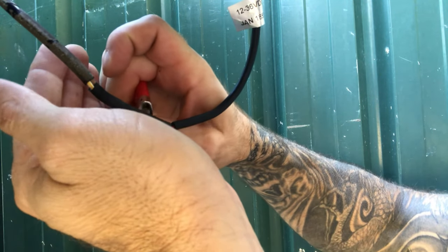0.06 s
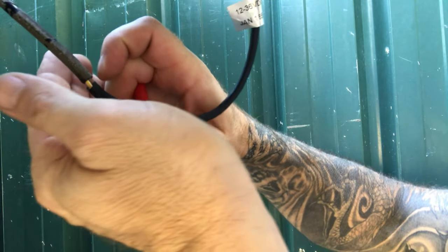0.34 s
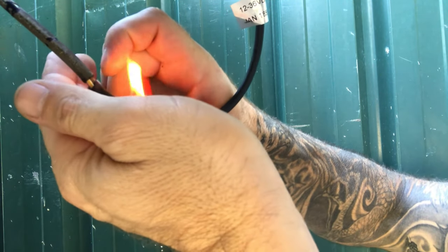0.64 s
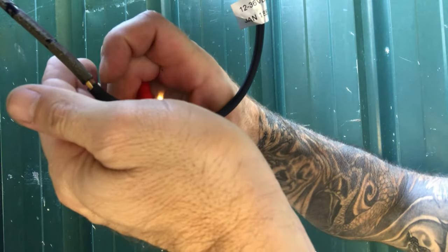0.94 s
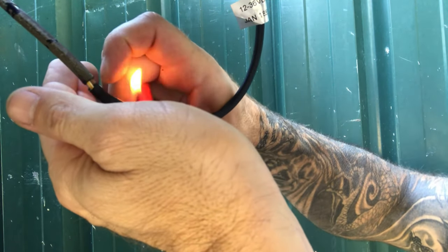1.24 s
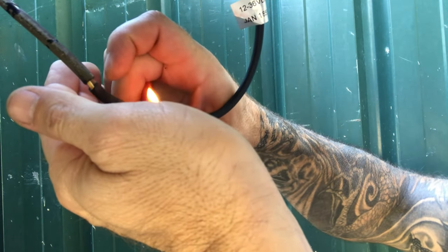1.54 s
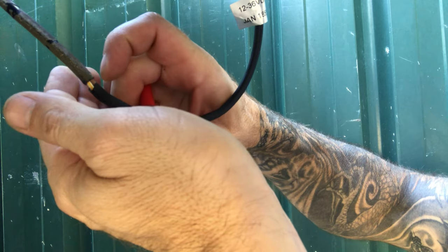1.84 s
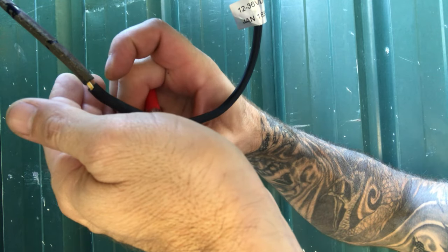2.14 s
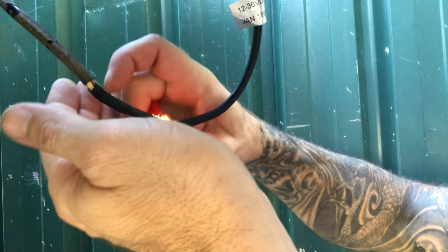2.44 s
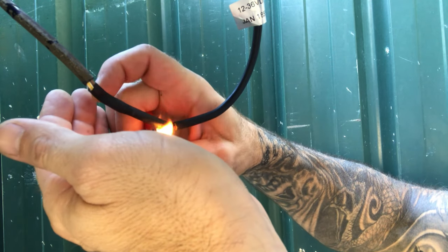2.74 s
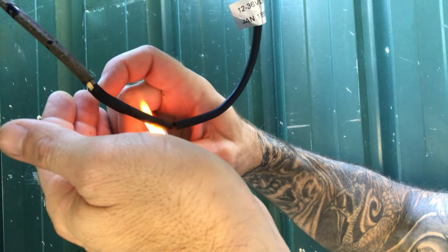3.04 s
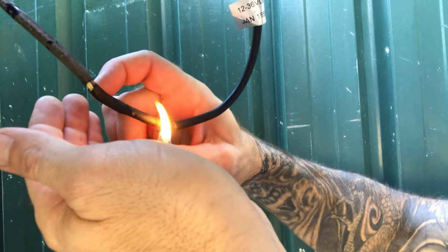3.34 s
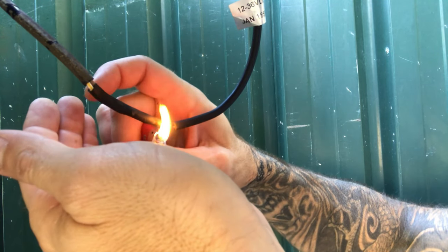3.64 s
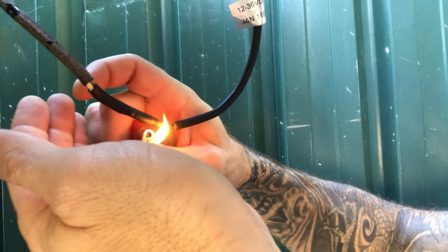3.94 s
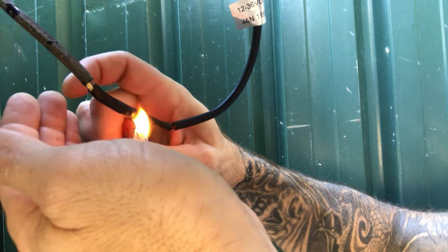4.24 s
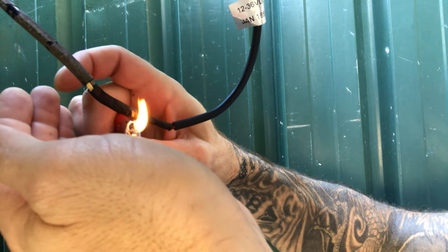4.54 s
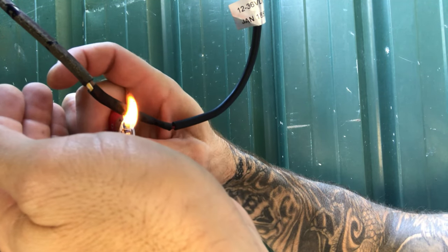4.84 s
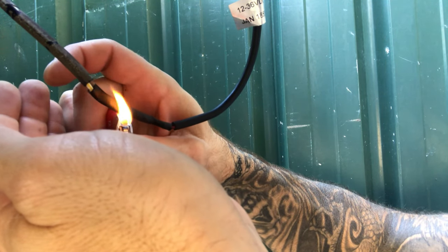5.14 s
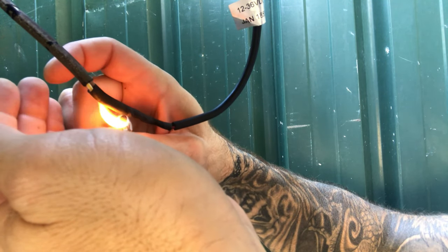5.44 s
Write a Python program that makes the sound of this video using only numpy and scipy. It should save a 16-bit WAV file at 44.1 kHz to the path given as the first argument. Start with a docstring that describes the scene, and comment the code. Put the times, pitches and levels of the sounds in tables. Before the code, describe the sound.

A flint lighter is struck twice close by outdoors, over low wind rumble and a distant engine revving up.

```python
"""Open air, a flint lighter in cupped hands close to the microphone. Wind rumbles on the capsule over
far traffic and a faint whine. At 0.4 s the wheel grinds, then rasps over the flint; the thumb lands on
the gas lever and small parts tick. Far birds whistle, and from 1.2 s a distant engine drones up through
its revs. The second strike comes at 2.4 s. After 4 s the birds call again, and near 5 s a car's tyres
sing on a far road."""
import sys
import numpy as np
from scipy import signal
from scipy.fft import rfft, irfft, next_fast_len
from scipy.io import wavfile

SR = 44100
rng = np.random.default_rng(int(sys.argv[2]) if len(sys.argv) > 2 else 0)


def to_wav(sig):
    """Store sig (one row per channel, or 1-D mono) as 16-bit WAV at the path in sys.argv[1].

    Samples outside -1..1 are clipped; the rate is SR.
    """
    pcm = np.clip(np.atleast_2d(sig), -1, 1) * 32767
    pcm = np.round(pcm).astype(np.int16)
    wavfile.write(sys.argv[1], SR, pcm.T)  # frames by channels


N = 241823
TIME = np.arange(N) / SR

# spectra of wind on the microphone, far traffic and fine hiss: (frequency [Hz], relative density [dB])
WIND_SPECTRUM = [(24, -40), (33, -35), (45, -1), (60, -2), (80, 1), (110, 2.5), (160, -13), (235, -7.5),
                 (330, -15), (480, -23.5), (800, -39)]
TRAFFIC_SPECTRUM = [(200, -9), (310, -2), (480, -10), (650, -3.5), (770, -7), (920, -5), (1100, -6.5),
                    (1500, -9.5), (2200, -18), (3200, -34)]
HISS_SPECTRUM = [(1200, -19), (2000, -2.5), (2600, -1.5), (3300, -3.5), (4350, -6.5), (4850, -12.5),
                 (5400, -9.5), (6650, -11), (8200, -18), (9350, -17), (10400, -27.5), (11500, -22.5),
                 (15800, -22)]
# rise and fall of the far traffic: (time [s], relative level [dB])
TRAFFIC_SWELL = [(0.0, -54), (0.69, -52.5), (2.14, -55), (3.4, -54), (3.97, -55.5), (4.49, -54),
                 (5.48, -53)]
# far birds: (start [s], end [s], start pitch [Hz], end pitch [Hz], level [dB], hoarseness [Hz])
BIRD_CALLS = [(.48, .69, 4520, 4520, -67, 80), (1.22, 1.42, 4370, 4200, -71, 55),
              (1.74, 1.87, 4400, 4430, -73, 50), (1.98, 2.15, 4420, 4410, -73, 70),
              (4.06, 4.13, 4150, 4430, -65, 60), (4.09, 4.22, 4450, 4440, -60, 70),
              (4.2, 4.32, 4300, 4140, -65, 50), (4.24, 4.36, 3660, 3300, -60, 250)]
# the distant engine picks up quickly, then pulls steadily: (time [s], firing rate [Hz])
ENGINE_REVS = [(1.2, 57), (1.42, 64.5), (1.84, 89.6), (2.2, 90.1), (2.38, 94.8), (2.75, 96.8), (4.0, 111.6),
               (5.48, 120)]
# its drone swells and sinks on the way: (time [s], relative level [dB])
ENGINE_SWELL = [(1.2, -54), (1.4, -42.5), (1.69, -48.0), (1.8, -34.5), (2.21, -34.5), (2.36, -29.1),
                (2.75, -28), (2.91, -34.5), (3.08, -55), (3.15, -40.5), (3.42, -29.5), (4.02, -27.8),
                (4.37, -32.5), (4.44, -39), (4.76, -38), (4.93, -49.7), (5.31, -48.5), (5.46, -38.5)]
# exhaust; uneven cylinders add in-between lines: (multiple of firing rate, relative level [dB])
EXHAUST_PARTIALS = [(.45, -35), (0.751, -32), (1, .5), (1.249, -25), (1.67, -34), (2, -33.5), (2.25, -32)]
# resonances that boom as a partial climbs through: (frequency [Hz], half width [Hz], boost [dB])
EXHAUST_BOOMS = [(50.5, 2, 19), (191.2, 2.4, 12), (215.4, 2.5, 8.5)]
# ringing of the plastic body and of the steel wheel on its axle: (frequency [Hz], width [Hz], gain [dB])
BODY_MODES = [(820, 220, -3.5), (1440, 280, -3), (2020, 420, -0.5), (3080, 560, -6)]
WHEEL_MODES = [(3300, 190, -2.5), (3630, 290, 7), (5180, 230, -4), (7650, 180, 7.5), (10100, 200, -12),
               (11800, 300, -5)]
# ringing of the metal hood, shifted by the grip in each strike: (frequency [Hz], width [Hz], gain [dB])
FIRST_HOOD_MODES = [(1480, 110, -3), (2340, 180, -11), (3100, 340, -6), (3900, 250, 2), (5500, 130, 4),
                    (6270, 120, -1), (6950, 130, 1), (8330, 150, 2), (9430, 150, 5), (10300, 200, -8),
                    (11100, 150, -10), (12800, 160, -1), (15600, 120, -6)]
SECOND_HOOD_MODES = [(1870, 160, -10), (3230, 230, -3), (5350, 90, 2), (5700, 90, 1), (6500, 100, -1),
                     (6970, 160, 1), (7300, 180, -1), (7850, 80, -5), (9540, 100, -2), (10100, 110, 5),
                     (12000, 100, -8), (12800, 225, 4), (13800, 400, -8)]
# colour that the grip gives each strike: (frequency [Hz], relative gain [dB])
FIRST_GRIP_COLOUR = [(500, -10), (1400, 3), (3200, 2.5), (4800, -3.5), (6700, 5.5), (8700, -1), (11000, -1),
                     (15800, 1.5)]
SECOND_GRIP_COLOUR = [(500, -2), (1800, -3), (3200, -3.5), (4800, -3.5), (6800, 1.5), (8800, -5),
                      (13000, -3), (15800, -7)]
# small contacts of wheel and grip: (time [s], relative level [dB], hardness as a low-pass cutoff [Hz])
HANDLING_TICKS = [(.135, -34.5, 3000), (.2035, -48, 12000), (.408, -31, 4500), (.4445, -30, 7000),
                  (.4598, -34, 9000), (2.2247, -40.5, 5000), (2.386, -32, 9000), (2.4115, -45, 12000),
                  (2.4157, -36, 9000), (2.444, -44, 9000), (2.5934, -46, 15000)]
# thumb landing on the gas lever: (time [s], relative level [dB])
LEVER_KNOCKS = [(.4253, -22), (2.3788, -24.5)]
# creep while the thumb still grips the wheel: (start [s], end [s], final level [dB], swell [dB])
WHEEL_GRINDS = [(.386, 0.425, -39, 22), (2.358, 2.375, -44, 7)]
# each turn of the spark wheel:
# (slip time [s], spin length [s], spin level [dB], drag length [s], drag level [dB], slowing [dB/s])
WHEEL_TURNS = [(.4263, 0.0038, -29, 0.021, -37.5, 620), (2.3807, 0.00072, -32.5, 0.03, -35.8, 950)]

WIND_DB = -43.6
HISS_DB, HISS_EARLY_DB, HISS_SETTLES_S = -61.5, 4.5, 1.67   # the hiss starts louder and settles
RUMBLE_DB, RUMBLE_HOLD_S = -47.5, 1.5
WHINE_DB, WHINE_HOLD_S = -65, 1.34
DIE_AWAY_DB_PER_S = 27   # rumble and whine
CAR_NEAREST_S, CAR_PASS_S, CAR_DB = 5.12, 0.57, -57
SPIN_ATTACK_S, SPIN_RELEASE_DB_PER_S = 0.0014, 3000   # the snap of the free spin
ECHO_TAIL_DB, ECHO_TAIL_DB_PER_S = -59, 259   # the faint tail of each rasp, reflected off a wall
MIC_HISS_DB, CUTOFF_HZ = -71.5, 15800


def from_db(db):
    """Decibels to gain."""
    return 10 ** (np.asarray(db) / 20)


def unit_rms(x):
    """Scale to rms 1."""
    return x / np.sqrt(np.mean(x ** 2) + 1e-20)


def curve(points):
    """Join (time, value) points, sample by sample."""
    return np.interp(TIME, *np.transpose(points))


def held(db, until_s, fall_db_per_s):
    """A steady gain that dies away after a given moment."""
    return from_db(db - fall_db_per_s * np.maximum(TIME - until_s, 0))


def drift(rate_hz):
    """Smooth random wander with rms 1."""
    step, run_in = 40, 2000
    pole = np.exp(-2 * np.pi * rate_hz * step / SR)
    noise = rng.standard_normal(N // step + run_in + 2)
    slow = signal.lfilter([1], [1, -2 * pole, pole * pole], noise)[run_in:]
    return np.interp(np.arange(N) / step, np.arange(len(slow)), unit_rms(slow))


def coloured(x, spectrum):
    """Filter a steady sound by a spectrum that falls away beyond its ends; rms 1."""
    hz, db = np.transpose(spectrum)
    size = next_fast_len(N)
    bins_hz = np.maximum(np.arange(size // 2 + 1) * SR / size, 1)
    skirts = np.minimum(bins_hz / hz[0], 1) ** 2 * np.minimum(hz[-1] / bins_hz, 1) ** 2
    gain = from_db(np.interp(np.log(bins_hz), np.log(hz), db))
    return unit_rms(irfft(rfft(x, size) * skirts * gain, size)[:N])


def resonance(x, hz, width_hz):
    """Two-pole resonance with gain 1 at its peak."""
    r = np.exp(-np.pi * width_hz / SR)
    feedback = [1, -2 * r * np.cos(2 * np.pi * hz / SR), r * r]
    return signal.lfilter(np.array([1, 0, -1]) * (1 - r * r) / 2, feedback, x + 1e-18)


def ringing(x, modes):
    """Parallel resonances of one object."""
    return sum(from_db(db) * resonance(x, hz, width) for hz, width, db in modes)


def clicks(events):
    """One impulse for each (time, level) event."""
    impulses = np.zeros(N)
    for time_s, db in events:
        impulses[round(time_s * SR)] += from_db(db)
    return impulses


def cracks(per_s, spread_db):
    """Random impulses of uneven size and sign."""
    size = from_db(spread_db * rng.uniform(-1, 1, N))
    sign = np.sign(rng.standard_normal(N))
    return (rng.random(N) < per_s / SR) * sign * size


def air_noise(spectrum, gain_db):
    """Smooth noise of a given colour."""
    return coloured(rng.standard_normal(N), spectrum) * from_db(gain_db)


def singing_band(hz, width_hz):
    """Noise gathered around one pitch; rms 1."""
    band = resonance(rng.standard_normal(N), hz, width_hz)
    return unit_rms(resonance(band, hz, width_hz))


def open_air(gust_db, gust_rate_hz):
    """Wind buffets the microphone; far traffic and a fine hiss lie smooth behind it."""
    wind = from_db(gust_db * drift(gust_rate_hz)) * air_noise(WIND_SPECTRUM, WIND_DB)
    traffic = from_db(curve(TRAFFIC_SWELL)) * air_noise(TRAFFIC_SPECTRUM, gain_db=0.5)
    hiss_db = HISS_DB + HISS_EARLY_DB * np.exp(-(TIME / HISS_SETTLES_S) ** 2)
    return wind + traffic + air_noise(HISS_SPECTRUM, hiss_db)


def far_road():
    """A rumble and a whine die away; later a car's tyres swell as it comes nearer."""
    rumble = held(RUMBLE_DB, RUMBLE_HOLD_S, DIE_AWAY_DB_PER_S) * singing_band(hz=59.7, width_hz=32)
    whine = held(WHINE_DB, WHINE_HOLD_S, DIE_AWAY_DB_PER_S) * singing_band(hz=685.6, width_hz=23)
    relative_distance = np.hypot(1, (TIME - CAR_NEAREST_S) / CAR_PASS_S)
    tyres = from_db(CAR_DB) / relative_distance * singing_band(hz=970, width_hz=150)
    return rumble + whine + tyres


def far_birds():
    """Gliding whistles that swell and fade, blurred by hoarseness and distance."""
    calls = np.zeros(N)
    for start, end, start_hz, end_hz, db, blur_hz in BIRD_CALLS:
        phase = 2 * np.pi * np.cumsum(curve([(start, start_hz), (end, end_hz)])) / SR
        swell = np.sin(np.pi * np.clip((TIME - start) / (end - start), 0, 1))
        whistle = drift(blur_hz) * np.cos(phase) + drift(blur_hz) * np.sin(phase)
        calls += from_db(db) * swell * whistle
    return calls


def distant_engine(waver, flutter_db, gain_db):
    """Only the lowest exhaust partials reach the microphone; they flutter, and boom at resonances."""
    firing_hz = curve(ENGINE_REVS)
    phase = 2 * np.pi * np.cumsum(firing_hz * (1 + waver * drift(rate_hz=16.5))) / SR
    drone = np.zeros(N)
    for multiple, db in EXHAUST_PARTIALS:
        boom_db = sum(boost_db / (1 + ((multiple * firing_hz - hz) / half_width) ** 2)
                      for hz, half_width, boost_db in EXHAUST_BOOMS)
        drone += from_db(db + boom_db + flutter_db * drift(rate_hz=9.9)) * np.sin(multiple * phase)
    fade_in = np.clip((TIME - ENGINE_REVS[0][0]) / 0.062, 0, 1)
    return np.sqrt(2) * from_db(curve(ENGINE_SWELL) + gain_db) * drone * fade_in


def handling_ticks(decay_s, wheel_db, body_db, direct_db):
    """Brief gritty contacts, close up, ring wheel and body; skin makes a duller tick than steel."""
    pole = np.exp(-1 / (decay_s * SR))
    contact = np.zeros(N)
    for time_s, db, hardness_hz in HANDLING_TICKS:
        decay = signal.lfilter([1], [1, -pole], clicks([(time_s, db)]) + 1e-18)
        grit = decay * rng.standard_normal(N)
        contact += signal.lfilter(*signal.butter(1, hardness_hz, fs=SR), grit)
    wheel = from_db(wheel_db) * ringing(contact, WHEEL_MODES)
    body = from_db(body_db) * ringing(contact, BODY_MODES)
    return wheel + body + from_db(direct_db) * contact


def gas_lever(gain_db):
    """The thumb slips off the wheel and knocks the lever against the plastic body."""
    return from_db(gain_db) * ringing(clicks(LEVER_KNOCKS), BODY_MODES)


def wheel_grind(slips_per_s, spread_db):
    """Before it spins free the wheel creeps over the flint and rings ever louder."""
    level = np.zeros(N)
    for start, end, db, swell_db in WHEEL_GRINDS:
        creeping = (TIME >= start) & (TIME <= end)
        level += creeping * from_db(curve([(start, db - swell_db), (end, db)]))
    return level * unit_rms(ringing(cracks(slips_per_s, spread_db), WHEEL_MODES))


def turn_envelope(slip_s, spin_s, spin_db, drag_s, drag_db, slowing_db_per_s):
    """The wheel drags ever harder, slips into a brief spin, then slows, leaving a faint reflected tail."""
    pressing = np.clip(1 + (TIME - slip_s) / drag_s, 0, 1) ** 2
    slipping = np.clip(1 + (TIME - slip_s) / SPIN_ATTACK_S, 0, 1)
    stop_s = slip_s + spin_s
    spin = held(spin_db, stop_s, SPIN_RELEASE_DB_PER_S)
    echo_tail = held(ECHO_TAIL_DB, stop_s, ECHO_TAIL_DB_PER_S)
    return pressing * held(drag_db, stop_s, slowing_db_per_s) + slipping * (spin + echo_tail)


def flint_rasp(turn, hood_modes, grip_colour, chips_per_s, spread_db, direct_db):
    """Teeth tear chips off the flint: dense cracks, heard directly and through the metal hood."""
    chips = cracks(chips_per_s, spread_db)
    rasp = ringing(chips, hood_modes) + from_db(direct_db) * chips
    return coloured(rasp, grip_colour) * turn_envelope(*turn)


def scene():
    """One microphone outdoors: the lighter close by, engine, road and birds far off."""
    first = flint_rasp(WHEEL_TURNS[0], FIRST_HOOD_MODES, FIRST_GRIP_COLOUR,
                       chips_per_s=16000, spread_db=3, direct_db=-4.0)
    second = flint_rasp(WHEEL_TURNS[1], SECOND_HOOD_MODES, SECOND_GRIP_COLOUR,
                        chips_per_s=14000, spread_db=8, direct_db=-6.0)
    lighter = first + second + wheel_grind(slips_per_s=4900, spread_db=11) + gas_lever(gain_db=23.0)
    handling = handling_ticks(decay_s=0.0017, wheel_db=-14.0, body_db=-1.5, direct_db=-6.0)
    far = distant_engine(waver=0.0025, flutter_db=-0.3, gain_db=-0.5) + far_road() + far_birds()
    return (lighter + handling + far + open_air(gust_db=0.5, gust_rate_hz=2.9))[None]


def record(dry):
    """The microphone adds its own faint hiss; the top is cut steeply."""
    heard = dry + from_db(MIC_HISS_DB) * rng.standard_normal(dry.shape)
    return signal.sosfilt(signal.ellip(12, .1, 80, CUTOFF_HZ, fs=SR, output="sos"), heard)


dry = scene()
out = record(dry)
to_wav(out)
```